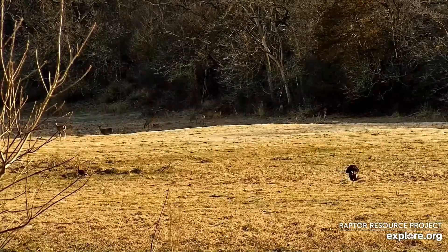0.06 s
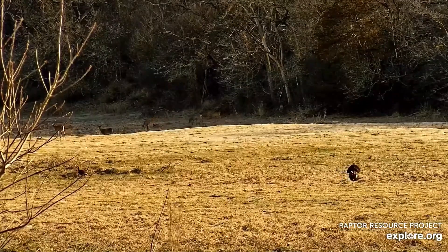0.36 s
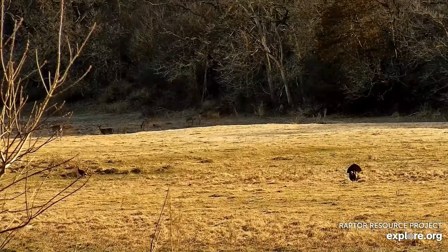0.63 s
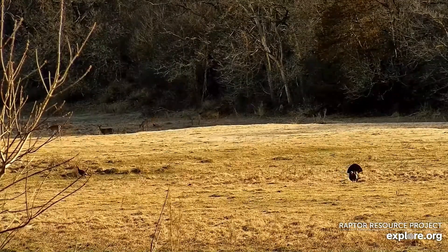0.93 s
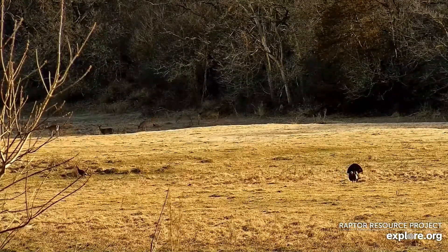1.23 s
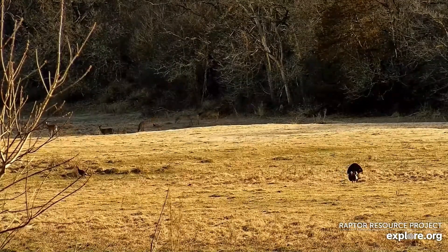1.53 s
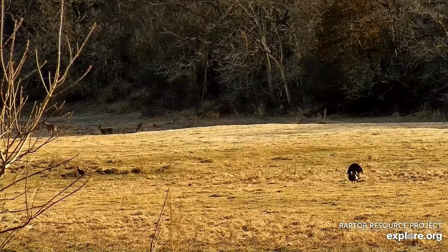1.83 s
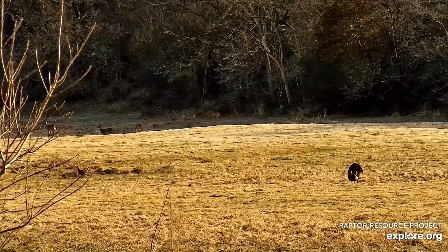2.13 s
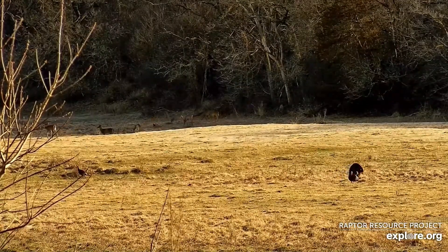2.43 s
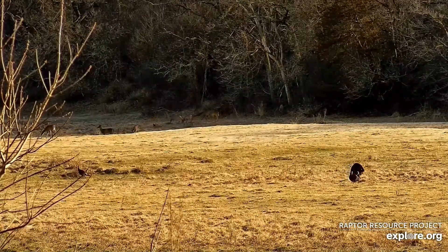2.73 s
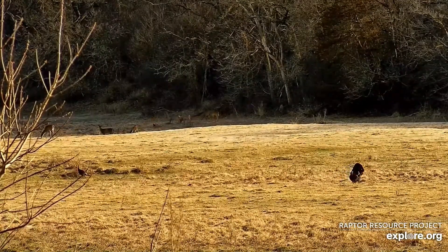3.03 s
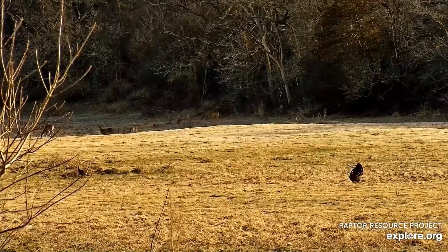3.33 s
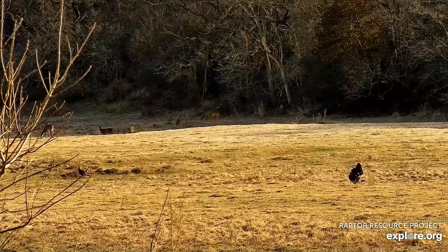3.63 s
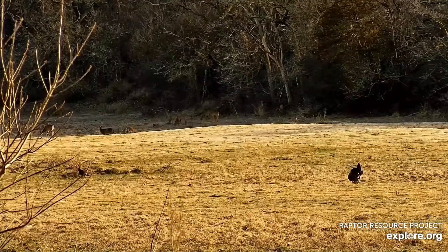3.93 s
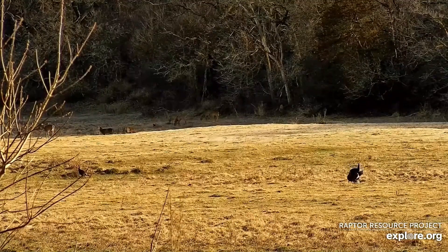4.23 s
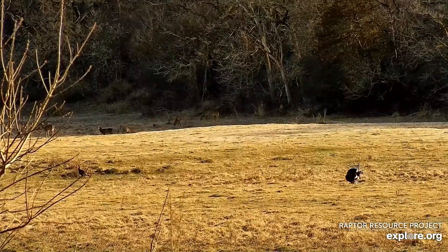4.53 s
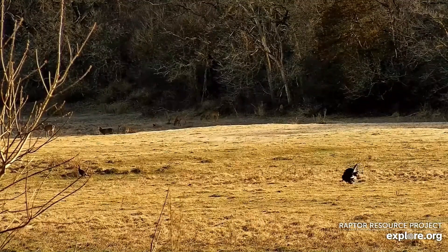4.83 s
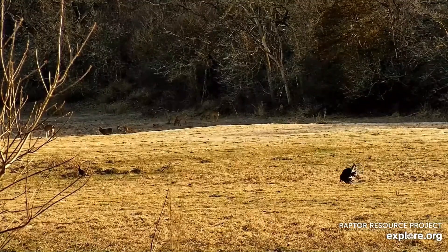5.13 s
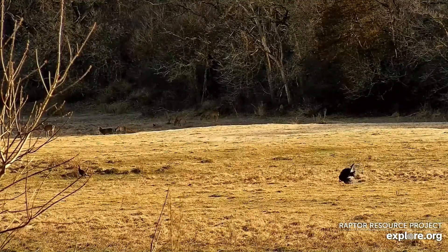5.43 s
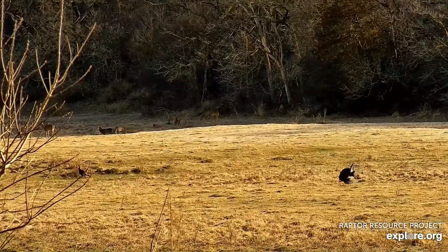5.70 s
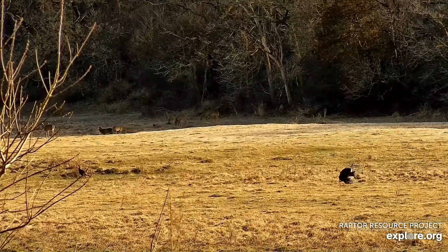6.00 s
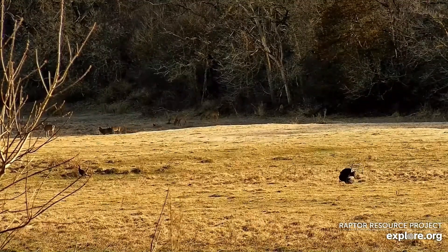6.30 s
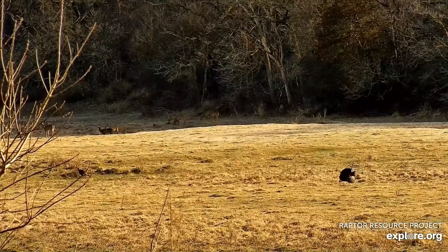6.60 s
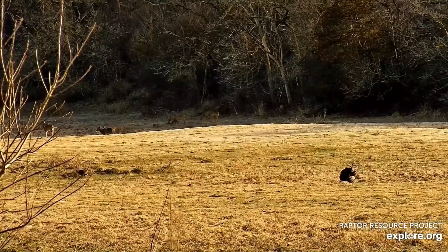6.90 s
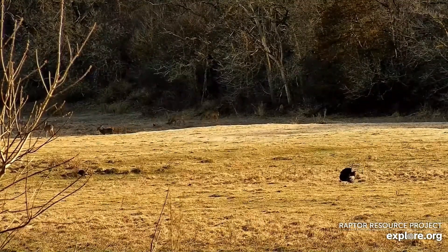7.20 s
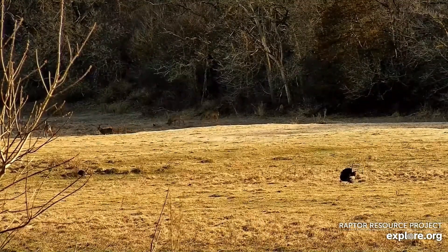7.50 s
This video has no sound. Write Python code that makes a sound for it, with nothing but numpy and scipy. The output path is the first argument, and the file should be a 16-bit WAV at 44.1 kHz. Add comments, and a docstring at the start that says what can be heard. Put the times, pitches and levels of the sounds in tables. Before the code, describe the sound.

Distant birds warble, trill and scold while woodpeckers drum, then a near songbird whistles a slurred phrase over soft outdoor hiss.

```python
"""Morning on a meadow at the edge of a wood, heard through an almost mono outdoor microphone.
Over a soft hiss and a faint electrical hum, far birds warble, whistle and trill with the syrinx.
A woodpecker's long roll rings the modes of a dry trunk; then come harsh scolds, thin high notes,
a buzzing trill and a far woodpecker on a hollow trunk. Last, a near songbird whistles a slurred
phrase and the far woodpecker drums again. Throughout, the trees scatter every note back."""
import sys
import numpy as np
from scipy import signal
from scipy.fft import rfft, irfft, next_fast_len
from scipy.io import wavfile
from scipy.ndimage import uniform_filter1d

SR = 44100
rng = np.random.default_rng(int(sys.argv[2]) if len(sys.argv) > 2 else 0)


def file_out(sig):
    """Save sig as 16-bit WAV at sys.argv[1]."""
    # one column per channel
    cols = np.atleast_2d(sig).T
    # limit, then scale
    lim = np.clip(cols, -1, 1)
    pcm = np.round(lim * 32767).astype(np.int16)
    wavfile.write(sys.argv[1], SR, pcm)


N = 332955
TIME = np.arange(N) / SR

# Levels in the tables are relative: gains and filters follow.
# Spectra of the land's murmur and the microphone's hiss. Each row: frequency in Hz, level in dB.
MURMUR_SPECTRUM = [(50, -47), (145, -17), (200, -3), (250, 5), (640, -2.5), (950, -2.5), (1300, 2),
                   (2500, 0.5), (4500, -5.5), (5500, -21)]
HISS_SPECTRUM = [(2000, -31), (4700, 3), (6000, 2), (10000, -3), (15500, -8)]
# Electrical hum. Each row: frequency in Hz, level in dB.
HUM_PARTIALS = [(116, -76), (259, -62), (490, -65), (642, -64.5)]
# Far warbled notes. Each row: start and length in seconds, first and last pitch in Hz, bend,
# level, fade and softening of the ends in dB, swings per second, swing depth in Hz.
WARBLE_NOTES = [ (0.061, 0.0545, 2230, 2760, 1.5, -36, 6, 6.5, 83, 272),
                (0.815, 0.037, 3126, 2980, 1, -44.5, 9, 1, 160, 160),
                (1.034, 0.2, 1737, 2170, -3, -44, 2.5, -0.5, 54, 230),
                (1.41, 0.031, 3215, 2645, 0.5, -40, 3.5, 1, 153, 300),
                (2.085, 0.12, 7000, 8200, 1.5, -57.5, -1, 0, 72, 350),
                (2.283, 0.047, 2664, 3610, -2, -38.5, 13, 9, 125, 560),
                (3.338, .265, 2170, 3670, 3, -36.5, 6, 14.5, 85, 390),
                (3.879, 0.11, 4260, 4280, 0, -46.5, 2, -3.5, 118, 517),
                (3.972, 0.28, 4370, 4120, 0, -44, 6, 5, 103, 637)]
# Plain far whistles. Each row: start and length in seconds, first and last pitch in Hz, level in dB.
WHISTLE_NOTES = [ (0.199, 0.068, 1880, 1903, -54.5), (0.207, 0.048, 3774, 3810, -57),
                 (0.301, 0.15, 1643, 1608, -57.5), (0.314, 0.017, 2490, 2460, -45),
                 (2.37, 0.082, 2470, 2330, -55.5), (2.709, 0.14, 2510, 2370, -50),
                 (3.609, 0.095, 3180, 3264, -41), (3.741, 0.068, 2424, 3255, -45),
                 (0.764, 0.042, 2300, 2280, -54), (3.933, 0.014, 2435, 2520, -39.5),
                 (4.212, 0.071, 2467, 2690, -46), (4.377, 0.045, 3260, 3290, -44),
                 (4.475, 0.11, 3864, 3910, -50.5), (4.699, 0.15, 3900, 3750, -55),
                 (4.696, 0.16, 1950, 1810, -59.5), (4.755, 0.097, 2277, 2190, -52.5)]
# One syllable of the slurred trill. Each row: time into it in seconds, pitch in Hz, level in dB.
TRILL_SYLLABLE = [(0, 4800, -48), (.004, 3340, -42.5), (.011, 3020, -39.5), (.019, 2580, -37.5)]
# A sharp call, one list for each side of the syrinx. Each row: time in seconds, pitch in Hz, level in dB.
SHARP_CALL_SIDES = [
    [(.703, 8600, -33), (.716, 7450, -47), (.75, 7770, -39), (.785, 8600, -33.5)],
    [(.703, 9800, -42), (.718, 8500, -33), (.785, 9130, -37)],
]
# Force of the woodpecker's long roll. Each row: time in seconds, level in dB.
RATTLE_FORCE = [(0.799, -38.5), (1.1, -41.5), (1.4, -41.5), (1.78, -41.5), (1.95, -44.5), (2.05, -57)]
# Modes of its dry trunk. Each row: frequency in Hz, time to peak in seconds.
DRY_TRUNK_MODES = [(510, 0.0047), (715, 0.0043), (1260, 0.0025)]
# A peck's direct sound and three echoes. Each row: delay in seconds, level of each mode in dB.
PECK_ARRIVALS = [(0, -13, 0, 2), (.016, -6.5, -6.5, -23), (.027, -20, -12, -6), (.064, -10.5, -16, 2)]
# Spectra of a peck's crack and of the wash behind the roll. Each row: frequency in Hz, level in dB.
CRACK_SPECTRUM = [(50, -70), (400, -18), (1300, 1), (2200, 11.5), (3000, 1), (4200, -19)]
WASH_SPECTRUM = [(50, -75), (200, -38), (490, -3), (750, 2), (970, -8.5), (1220, 3.5), (1480, -3.5),
                 (1850, -3), (2900, -9.5), (3800, -37)]
# A falling slur, then a rising whip. Each row: start in seconds, slur level in dB,
# whip delay and length in seconds, whip level in dB.
COUPLETS = [(1.413, -60, 0.13, 0.1, -52.5), (1.967, -46, 0.13, 0.07, -50.5),
            (2.512, -47.5, .126, .105, -51), (3.076, -49.5, 0.13, 0.061, -51)]
# Effort of the scolds, one list a call. Each row: time in seconds, level in dB.
SCOLD_EFFORT = [
    [(2.275, -48), (2.292, -36), (2.335, -53)],
    [(2.856, -33.5), (2.89, -32.5), (3.02, -35), (3.175, -34), (3.195, -39)],
]
# Response of the scolding bird's throat. Each row: frequency in Hz, gain in dB.
SCOLD_THROAT = [(50, -80), (300, -49), (1300, -15), (1900, -7), (2150, -12), (2400, -7.5), (2620, 1),
                (3300, -1.5), (3650, 3), (3870, -3), (4150, -1.5), (5000, -25), (5700, -13), (6300, -16),
                (7300, -6.5), (8200, -16.5), (9200, -34), (9800, -23), (12000, -38)]
# A shrill tone in the long scold, and a slur from the other side of the syrinx.
# Each row: time in seconds, pitch in Hz, level in dB.
SCOLD_CORE_PATH = [(2.885, 3866, -35.5), (2.96, 3840, -37), (3.19, 3826, -43.5)]
SCOLD_SLUR_PATH = [(2.972, 4650, -53), (2.998, 4050, -33), (3.04, 3300, -37), (3.075, 2650, -39),
                   (3.105, 2280, -43)]
# Thin high notes. Each row: start in seconds, pitch in Hz, level in dB.
THIN_HIGH_NOTES = [(3.79, 7830, -60.5), (4.13, 7700, -60), (4.48, 7820, -59), (4.721, 7530, -58.5),
                   (5.0, 7400, -60), (5.271, 7190, -64), (5.541, 7400, -62)]
# Throat resonances of the buzzing trill. Each row: frequency and width in Hz, level in dB.
BUZZ_RESONANCES = [(2773, 220, 1), (3370, 230, -3), (4770, 230, -10.5)]
# The far woodpecker's rolls. Each row: start in seconds, level in dB, extra gain of the tick in dB.
DRUM_ROLLS = [(4.254, -40, 11.5), (7.436, -37.5, 7)]
# Spectrum of its bill's tick. Each row: frequency in Hz, level in dB.
TICK_SPECTRUM = [(200, -42), (1400, 1.5), (2900, 4.5), (4000, -20), (7000, -27)]
# The near phrase. Each row: start, length and lead-in in seconds, lead-in slope in Hz per second,
# glide in seconds, its first and last pitch in Hz, later fall in Hz per second, attack in seconds,
# level and swell in dB. A negative lead-in starts mid-glide.
NEAR_NOTES = [ (5.444, 0.075, 0.021, -1500, 0.034, 3330, 4056, 0, 0.016, -23.5, -5),
              (5.511, 0.084, 0.006, 0, 0.025, 4070, 4510, 0, .004, -30.5, 6),
              (5.609, 0.16, 0.02, -7000, 0.059, 3436, 4232, 1, 0.015, -23.5, -10.5),
              (5.841, 0.18, 0.021, -20000, 0.16, 4710, 4060, -2, 0.031, -18.5, 2),
              (6.155, 0.14, -0.062, -1, 0.18, 4570, 2783, -3, 0.0019, -20, -4.5),
              (6.35, 0.085, -0.0048, -6, 0.06, 2810, 3595, 3996, 0.00089, -19, 3),
              (6.47, 0.084, -0.011, 0, 0.075, 2820, 3576, 5000, 0.009, -19, 9.5),
              (6.603, 0.088, -0.0094, 0, 0.091, 2623, 3706, 0, 0.031, -15, 6),
              (7.028, 0.095, .044, 9000, .046, 2620, 4190, -7, 0.011, -21.5, 3),
              (7.178, 0.16, 0.046, 8000, 0.056, 2460, 3857, 10497, 0.0058, -23.5, 6.5),
              (7.391, 0.11, -0.031, 3, 0.11, 1913, 2165, 1000, 0.015, -19.5, -2),
              (7.536, 0.018, -0.00049, 0, 0.013, 2810, 4280, 0, .002, -29.5, 0)]
# Pass band of the near singer's throat. Each row: frequency in Hz, gain in dB.
NEAR_THROAT = [(2000, -17.5), (2450, -5.5), (2800, -1.5), (3350, 1), (3800, -3.5), (4120, -3), (4330, -10),
               (4700, -16.5), (5200, -15)]
# The near singer's buzz. Each row: time in seconds, centre pitch in Hz, level in dB.
NEAR_BUZZ_PATH = [(6.768, 4585, -38.5), (6.82, 4426, -31.5), (6.93, 4220, -33.5), (6.952, 4250, -45)]
# The top of the near song rings on most in the trees. Each row: frequency in Hz, gain in dB.
NEAR_ECHO_RESPONSE = [(2800, -1.5), (3700, -2.5), (4200, 7), (4700, 4.5)]
# Reverberation of the wood. Each row: frequency in Hz, time to fall 60 dB in seconds.
WOOD_DECAY = [(500, 1.2), (2000, 0.6), (4000, 0.71), (8000, 0.32)]
# Treble of the birdsong as it reaches the microphone. Each row: frequency in Hz, gain in dB.
SONG_RESPONSE = [(4500, 1.5), (5600, -4), (7200, 9), (9000, -12)]


def from_db(db):
    """Amplitude grows tenfold for every 20 dB."""
    return 10 ** (np.asarray(db) / 20)


def rms_one(x):
    """Normalisation to unit power."""
    return x / np.sqrt(np.mean(x ** 2) + 1e-20)


def at_hz(points, hz):
    """Interpolation on a logarithmic frequency axis."""
    known, value = np.transpose(points)
    return np.interp(np.log(np.maximum(hz, 1)), np.log(known), value)


def colour(x, spectrum):
    """Filtering multiplies each frequency by its own gain."""
    size = next_fast_len(len(x))
    hz = np.arange(size // 2 + 1) * SR / size
    return irfft(rfft(x, size) * from_db(at_hz(spectrum, hz)), size)[:len(x)]


def noise(spectrum):
    """Filtered white noise of unit power."""
    return rms_one(colour(rng.standard_normal(N), spectrum))


def wander(t, per_s):
    """Random modulation: straight lines between Gaussian values."""
    steps = (t - t[0]) * per_s
    knots = rng.standard_normal(int(steps[-1]) + 2)
    return np.interp(steps, np.arange(len(knots)), knots)


def envelope(t, times, db, ramp_s=.006):
    """An amplitude contour, gated smoothly at both ends."""
    gate = np.clip(np.minimum(t - times[0], times[-1] - t) / ramp_s + .5, 0, 1)
    return from_db(np.interp(t, times, db)) * np.sin(gate * np.pi / 2) ** 2


def mix(sounds):
    """Superposition of (start in seconds, samples) pairs."""
    out = np.zeros(N)
    for start_s, sound in sounds:
        i = max(int(start_s * SR), 0)
        out[i:i + len(sound)] += sound[:max(N - i, 0)]
    return out


def rhythm(start_s, gap_s, excess_s, settle, count):
    """Onset times whose gaps relax exponentially to a steady pace."""
    gaps = gap_s + excess_s * np.exp(-np.arange(count) / settle)
    return start_s + np.cumsum(gaps) - gaps


def background():
    """The noise floor: broadband murmur of the land, microphone hiss and the partials of a wavering hum."""
    hum = 0
    for hz, db in HUM_PARTIALS:
        wavering_time = TIME + np.cumsum(0.0052 * wander(TIME, 24.8)) / SR
        hum += from_db(db) * np.sqrt(2) * np.sin(2 * np.pi * hz * wavering_time)
    murmur = from_db(-47) * noise(MURMUR_SPECTRUM) * from_db(.5 * wander(TIME, 12))
    return murmur + from_db(-54) * noise(HISS_SPECTRUM) + hum


def syrinx(path, waver, flutter_db, overtone_db, swing_rate=0, swing_hz=0):
    """An oscillator and its octave follow rows of (seconds, Hz, dB); returns start and samples."""
    times, path_hz, db = np.transpose(path)
    t = np.arange(times.min() - .005, times.max() + .005, 1 / SR)
    centre = uniform_filter1d(np.interp(t, times, path_hz), size=300) * (1 + waver * wander(t, 391))
    pitch = centre + swing_hz * np.sin(2 * np.pi * swing_rate * (t - t[0]) + 0.43 * wander(t, 39.9))
    phase = 2 * np.pi * np.cumsum(pitch) / SR
    level = envelope(t, times, db) * from_db(flutter_db * np.tanh(wander(t, 150.2)))
    level *= (centre / pitch) ** 1.7   # louder at the bottom of each swing
    return t[0], np.sqrt(2) * level * (np.sin(phase) + from_db(overtone_db) * np.sin(2 * phase))


def far_path(start_s, length_s, from_hz, to_hz, bend, db, fade_db, edge_db, edge_share=0.3):
    """An exponential glide, moving early if its bend is positive and late if negative."""
    progress = np.linspace(0, 1, 40)
    travel = np.cumsum(np.exp(-bend * progress))
    pitch = from_hz + (to_hz - from_hz) * (travel - travel[0]) / (travel[-1] - travel[0])
    edges_db = edge_db * np.exp(-np.minimum(progress, 1 - progress) / edge_share)
    return np.transpose([start_s + length_s * progress, pitch, db - fade_db * progress - edges_db])


def warblers():
    """Frequency modulation too fast for the ear to follow is heard as a buzz."""
    notes = [syrinx(far_path(*glide), waver=0.0247, flutter_db=10.5, overtone_db=-29,
                    swing_rate=rate, swing_hz=depth) for *glide, rate, depth in WARBLE_NOTES]
    return from_db(-0.5) * mix(notes)


def whistlers():
    """Nearly sinusoidal glides are heard as whistles: plain notes and slur-and-whip couplets."""
    paths = []
    for start_s, slur_db, delay_s, length_s, whip_db in COUPLETS:
        paths.append(far_path(start_s, length_s=0.081, from_hz=2720, to_hz=2264, bend=4.9,
                              db=slur_db, fade_db=3.5, edge_db=0))
        paths.append(whip_path(start_s + delay_s, length_s, whip_db))
    paths += [far_path(*glide, bend=0.27, db=db, fade_db=-1, edge_db=0.5) for *glide, db in WHISTLE_NOTES]
    return from_db(4) * mix(syrinx(path, waver=0.0194, flutter_db=4, overtone_db=-40) for path in paths)


def slur_trill(pitch_spread=0.022, spread_db=1.5):
    """A repeated downward sweep makes a trill; it starts hurried, and no two syllables are alike."""
    syllables = []
    for start_s in rhythm(start_s=.328, gap_s=.028, excess_s=-.013, settle=1.5, count=15):
        tune, size = rng.standard_normal(2)
        path = [(start_s + after_s, hz * (1 + pitch_spread * tune), db + spread_db * size)
                for after_s, hz, db in TRILL_SYLLABLE]
        syllables.append(syrinx(path, waver=0.052, flutter_db=4.5, overtone_db=-38))
    return mix(syllables)


def sharp_call():
    """Biphonation: the two sides of the syrinx sound independent pitches at once."""
    sides = [syrinx(path, waver=0.0063, flutter_db=2, overtone_db=-60) for path in SHARP_CALL_SIDES]
    return from_db(-3.5) * mix(sides)


def knock(hz, swell_s):
    """A damped mode of a trunk swells and dies after a peck."""
    t = TIME[:SR // 20]
    age = t / swell_s
    return age ** 2 * np.exp(2 * (1 - age)) * np.sin(2 * np.pi * hz * t)


def impacts(blows, spectrum, decay_s):
    """A brief impact is broadband: each (seconds, dB) blow starts a decaying burst of noise."""
    decay = np.exp(-TIME[:SR // 8] / decay_s)
    level = mix((start_s, from_db(db) * decay) for start_s, db in blows)
    return colour(level * rng.standard_normal(N), spectrum)


def rattling_woodpecker(gap_s=.04683, ring_db=1.5, crack_db=10, wash_db=-3.5, uneven_db=2):
    """Impulse excitation: even pecks crack and ring a dry trunk; echoes and a wash fill the gaps."""
    times, db = np.transpose(RATTLE_FORCE)
    pecks = np.arange(times[0], times[-1], gap_s)
    force_db = np.interp(pecks, times, db)
    rings = []
    for start_s, peck_db in zip(pecks, force_db):
        for delay_s, *modes_db in PECK_ARRIVALS:
            for (hz, swell_s), mode_db in zip(DRY_TRUNK_MODES, modes_db):
                size, tune = rng.standard_normal(2)
                gain = from_db(peck_db + ring_db + mode_db + uneven_db * size)
                rings.append((start_s + delay_s, gain * knock(hz * (1 + 0.051 * tune), swell_s)))
    cracks = impacts(zip(pecks, force_db + crack_db), CRACK_SPECTRUM, decay_s=0.002)
    wash = envelope(TIME, times, db + wash_db) * noise(WASH_SPECTRUM)
    return mix(rings) + cracks + wash


def whip_path(start_s, length_s, db, from_hz=2804, rise_hz=135, rise_s=.035, fade_db_per_s=23):
    """An exponential rise in pitch steepens, so a longer whip ends higher."""
    t = np.linspace(0, length_s, 40)
    return np.transpose([start_s + t, from_hz + rise_hz * np.expm1(t / rise_s), db - fade_db_per_s * t])


def scolds(pulse_hz=631, jitter=.022, hiss_db=4.5):
    """Source and filter: a chaotic syrinx drives the throat; two tones join the long scold."""
    effort = sum(envelope(TIME, *np.transpose(call)) for call in SCOLD_EFFORT)
    pitch = pulse_hz * (1 + jitter * wander(TIME, 350) + jitter / 2 * wander(TIME, 40))
    phase = 2 * np.pi * np.cumsum(pitch) / SR
    harmonics = sum(np.sin(k * phase) * from_db(7.8 * wander(TIME, 90)) for k in range(2, 16))
    source = rms_one(harmonics) + from_db(hiss_db) * np.sqrt(2) * rng.standard_normal(N)
    source *= from_db(2.4 * wander(TIME, 240))
    rasp = colour(source * effort, SCOLD_THROAT) / np.std(colour(source, SCOLD_THROAT))
    slur = syrinx(SCOLD_SLUR_PATH, waver=0.0684, flutter_db=4, overtone_db=-22)
    core = syrinx(SCOLD_CORE_PATH, waver=0.0176, flutter_db=5.5, overtone_db=-32)
    return rasp + mix([slur, core])


def thin_notes(length_s=0.123):
    """High tones almost free of overtones sound thin; each rises slightly."""
    paths = [[(s, hz * .99, db), (s + length_s, hz * 1.01, db)] for s, hz, db in THIN_HIGH_NOTES]
    notes = [syrinx(path, waver=0.0035, flutter_db=8.5, overtone_db=-57) for path in paths]
    return from_db(-5) * mix(notes)


def buzz_trill(start_s=3.993, gap_s=.0325, jitter_s=0.0026, pulse_gap_s=0.0075, fade_db=4.5, count=19):
    """Bursts of three fading pulses excite the throat's resonances; the lowest sinks along the trill."""
    t = TIME[:SR // 50]
    bursts = start_s + gap_s * np.arange(count) + jitter_s * rng.standard_normal(count)
    pulses = []
    for burst_s, sag in zip(bursts, 0.031 * np.linspace(.5, -.5, count)):
        for pulse in range(3):
            for mode, (hz, width_hz, mode_db) in enumerate(BUZZ_RESONANCES):
                size, tune = rng.uniform(-1.24, 1, 2)
                pitch = hz * (1 + sag * (mode == 0) + 0.04 * tune)
                age = np.pi * width_hz * t
                ring = age * np.exp(1 - age) * np.sin(2 * np.pi * pitch * t)
                gain = from_db(-33.5 + mode_db - pulse * fade_db + 3.8 * size)
                pulses.append((burst_s + pulse * pulse_gap_s, gain * ring))
    return mix(pulses)


def far_woodpecker(trunk_hz=520, swell_s=0.0046, tire_db_per_s=4, uneven_db=5):
    """Each tick of the bill excites a hollow trunk's one low mode; a roll speeds up and tires."""
    rings, taps = [], []
    for start_s, db, tick_db in DRUM_ROLLS:
        times = rhythm(start_s, gap_s=.054, excess_s=.0106, settle=3.9, count=17)
        force_db = db - tire_db_per_s * (times - start_s) + uneven_db * rng.uniform(-1.3, 1, len(times))
        force_db[0] -= 5.5   # the roll opens softly
        rings += [(s, gain * knock(trunk_hz, swell_s)) for s, gain in zip(times, from_db(force_db))]
        taps += zip(times, force_db + tick_db)
    ticks = impacts(taps, TICK_SPECTRUM, decay_s=0.003)
    return early_echoes(ticks, scatter_db=-3) + mix(rings)


def near_path(start_s, length_s, lead_s, slope, glide_s, from_hz, to_hz, fall, attack_s, db, swell_db):
    """Lead-in, S-shaped glide and fall; a note gains level while its pitch is in the throat's pass band."""
    t = np.linspace(0, length_s, 80)
    glide = (1 - np.cos(np.pi * np.clip((t - lead_s) / glide_s, 0, 1))) / 2
    lead_hz = slope * np.minimum(t - lead_s, 0)
    fall_hz = fall * np.maximum(t - lead_s - glide_s, 0)
    pitch = from_hz + lead_hz + (to_hz - from_hz) * glide - fall_hz
    edges_db = 12 * np.exp(-t / attack_s) + 12 * np.exp((t - length_s) / 0.0023)   # onset and release
    level_db = db + swell_db * (t / length_s - .5) + at_hz(NEAR_THROAT, pitch) - edges_db
    return np.transpose([start_s + t, pitch, level_db])


def near_songbird():
    """The syrinx glides through a slurred phrase with one frequency-modulated buzz."""
    song = mix(syrinx(near_path(*note), waver=0.013, flutter_db=3, overtone_db=-39.5)
               for note in NEAR_NOTES)
    buzz = syrinx(NEAR_BUZZ_PATH, waver=0.034, flutter_db=5.5, overtone_db=-47,
                  swing_rate=96, swing_hz=506)
    song = from_db(-2.5) * early_echoes(song, scatter_db=-9.5, spread_s=0.019)
    return song + early_echoes(mix([buzz]), scatter_db=-8)


def early_echoes(x, scatter_db, spread_s=0.01, echoes_per_s=900):
    """Reflections from trunks close to a source interfere with it, smearing and rippling its sound."""
    t = TIME[:SR // 8]
    echoes = rng.standard_normal(len(t)) * (rng.random(len(t)) < echoes_per_s / SR)
    echoes *= np.exp(-t / spread_s)
    scattered = signal.fftconvolve(x, echoes / np.sqrt(np.sum(echoes ** 2) + 1e-20))[:N]
    return (x + from_db(scatter_db) * scattered) / np.sqrt(1 + from_db(scatter_db) ** 2)


def wood_reverb(x, build_s=0.0022):
    """Scattering from many trunks builds a diffuse field that dies soonest in the treble."""
    t = TIME[:SR]
    edges_hz = [100, 1000, 2800, 5600, 15000]
    response = 0
    for low, high in zip(edges_hz, edges_hz[1:]):
        band_pass = signal.butter(2, [low, high], "band", fs=SR, output="sos")
        decay = from_db(-60 * t / at_hz(WOOD_DECAY, np.sqrt(low * high)))
        response += signal.sosfilt(band_pass, rng.standard_normal(SR)) * decay
    response *= 1 - np.exp(-t / build_s)
    return signal.fftconvolve(x, response / np.sqrt(np.sum(response ** 2)))[:N]


def scene():
    """The reverberant share grows with distance; the two channels barely differ."""
    near = near_songbird()
    far = early_echoes(whistlers() + sharp_call() + thin_notes(), scatter_db=-6.5, spread_s=0.023)
    far += early_echoes(warblers(), scatter_db=-6.5)
    far += early_echoes(slur_trill(), scatter_db=-7, spread_s=0.0038)
    far += early_echoes(buzz_trill(), scatter_db=-5, spread_s=0.0052)
    song_reverb = wood_reverb(from_db(-13) * colour(near, NEAR_ECHO_RESPONSE) + from_db(-7) * far)
    songs = colour(near + far + song_reverb, SONG_RESPONSE)
    harsh = scolds() + rattling_woodpecker() + far_woodpecker()
    centre = harsh + from_db(-11.5) * wood_reverb(harsh) + background()
    side_hiss = from_db(-86) * rng.standard_normal(N)
    return np.array([from_db(0.28) * songs + centre + side_hiss, songs + centre - side_hiss])


def record(dry):
    """Band limiting: a steep elliptic low-pass removes the highest treble."""
    cutoff_hz = 15700
    return signal.sosfilt(signal.ellip(12, .1, 80, cutoff_hz, fs=SR, output="sos"), dry)


dry = scene()
out = record(dry)
file_out(out)
```